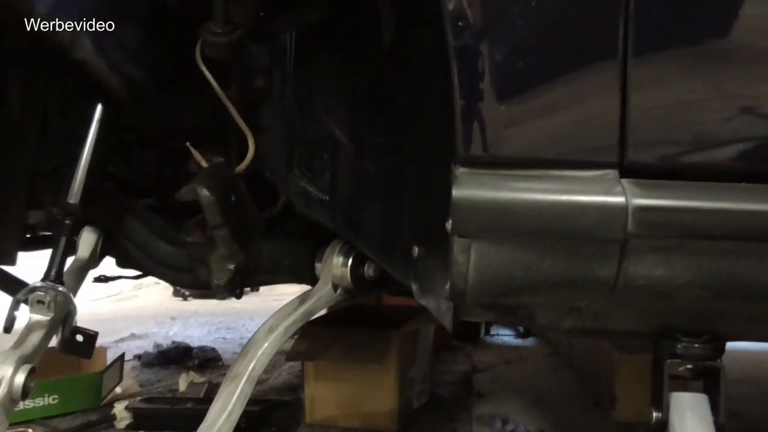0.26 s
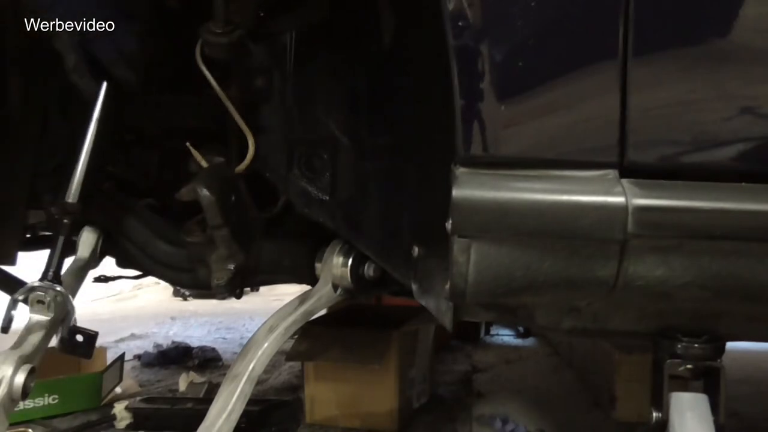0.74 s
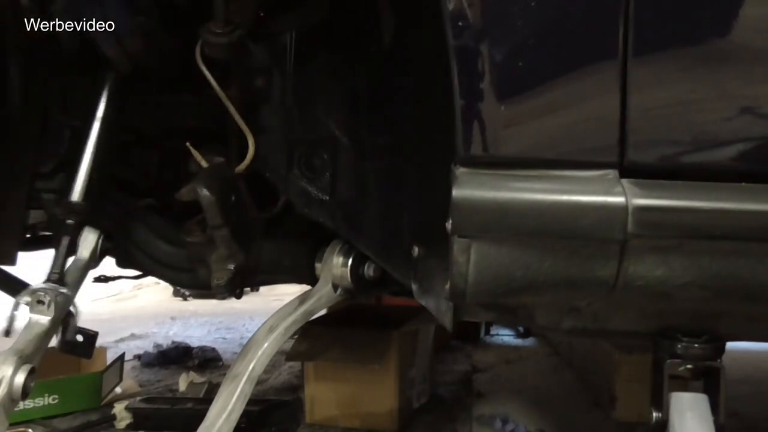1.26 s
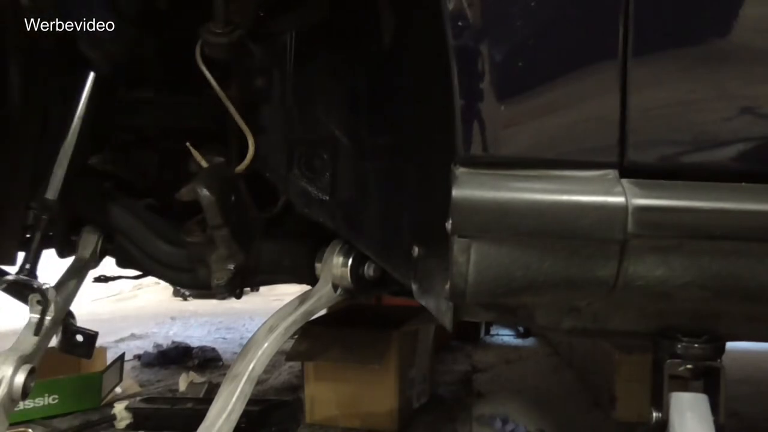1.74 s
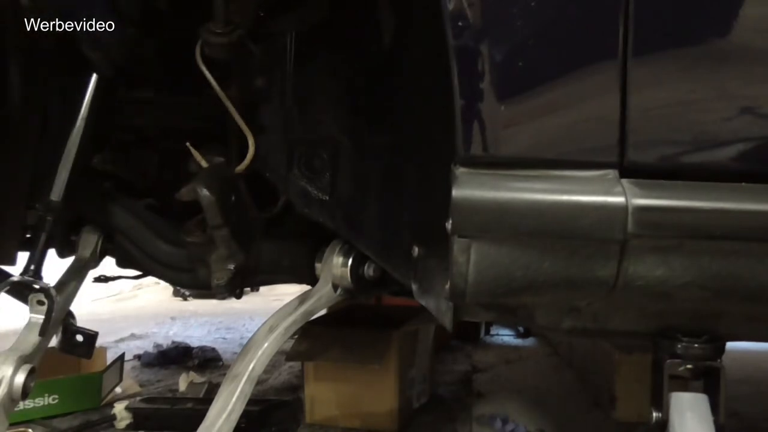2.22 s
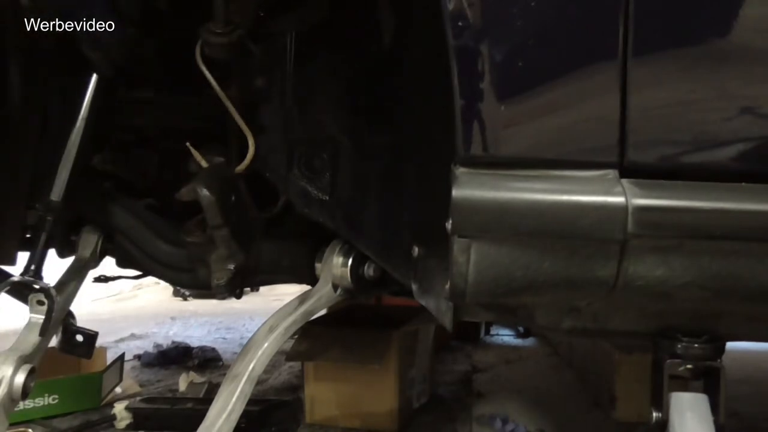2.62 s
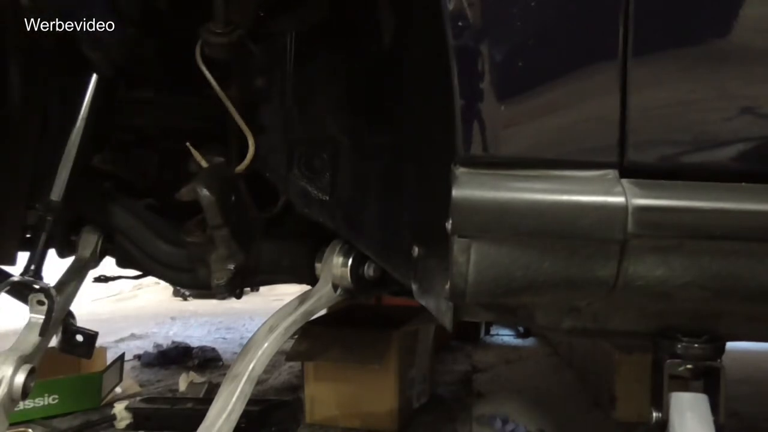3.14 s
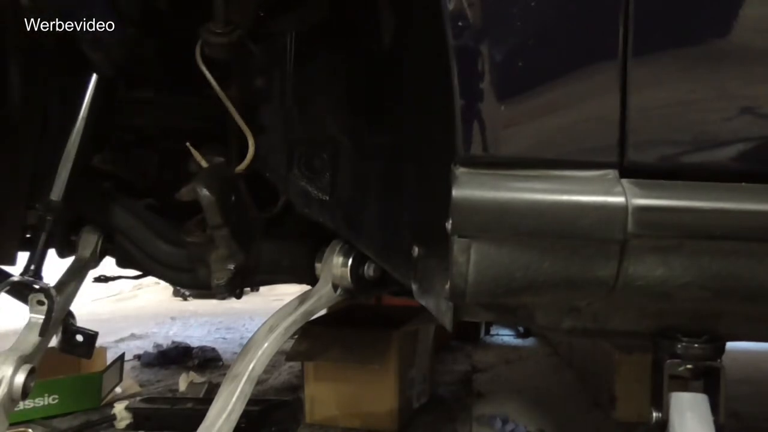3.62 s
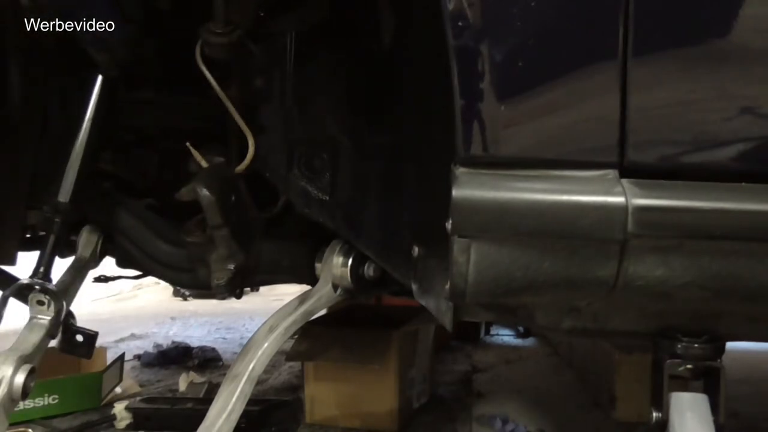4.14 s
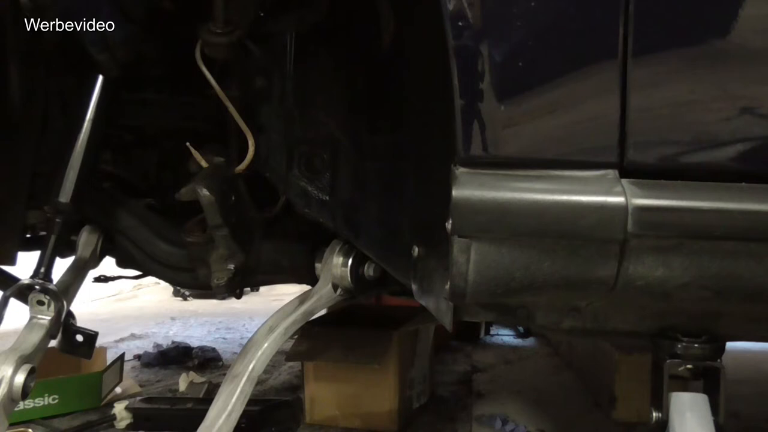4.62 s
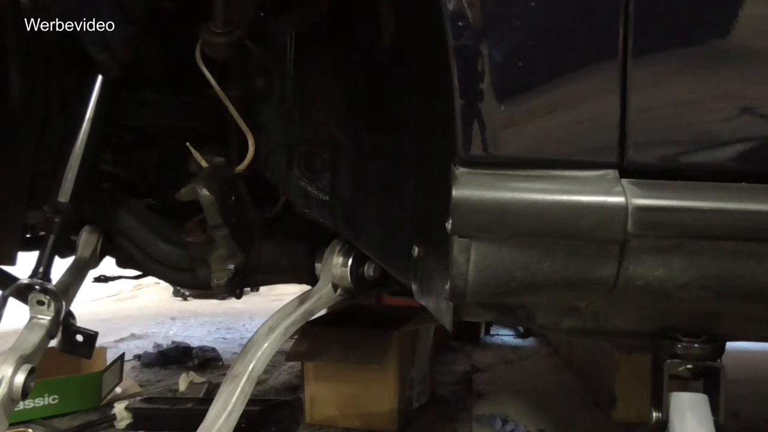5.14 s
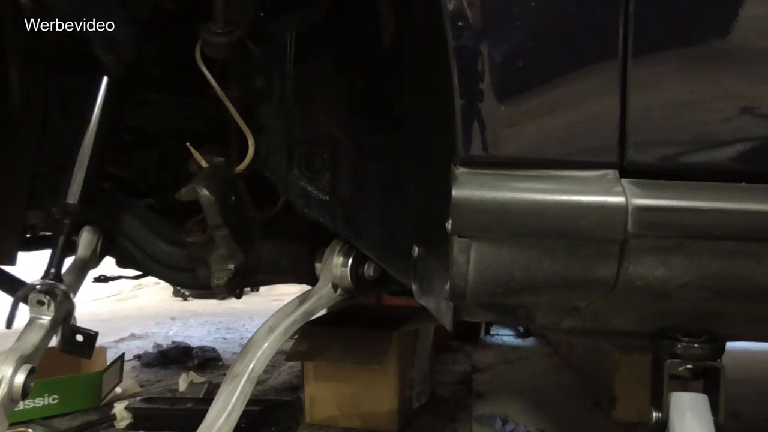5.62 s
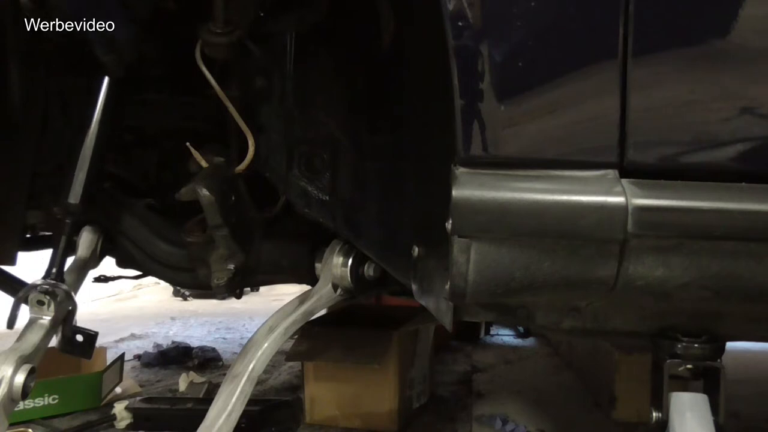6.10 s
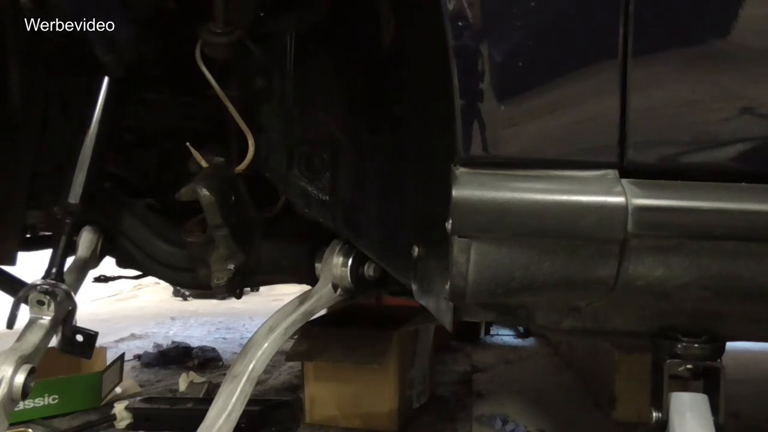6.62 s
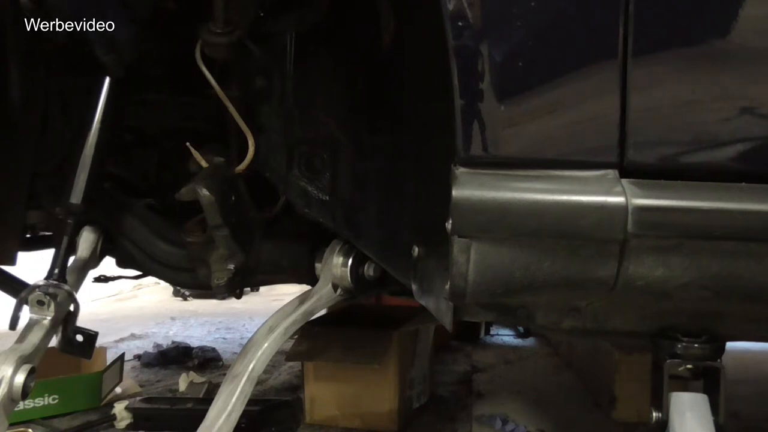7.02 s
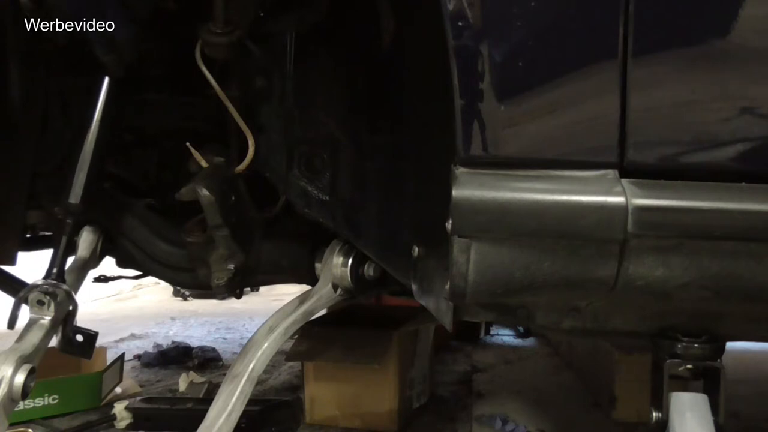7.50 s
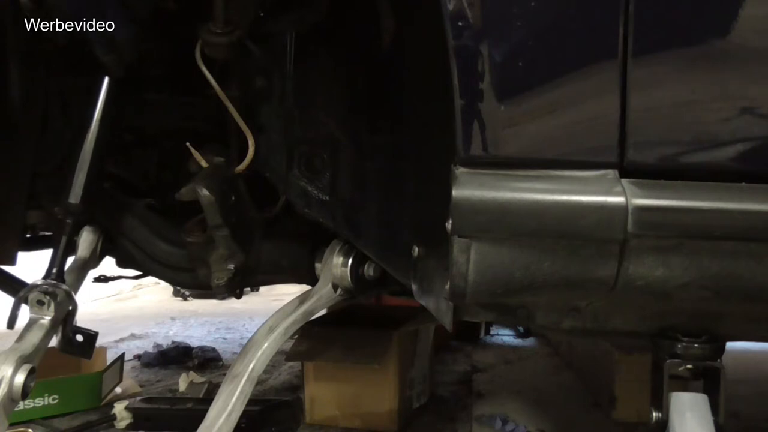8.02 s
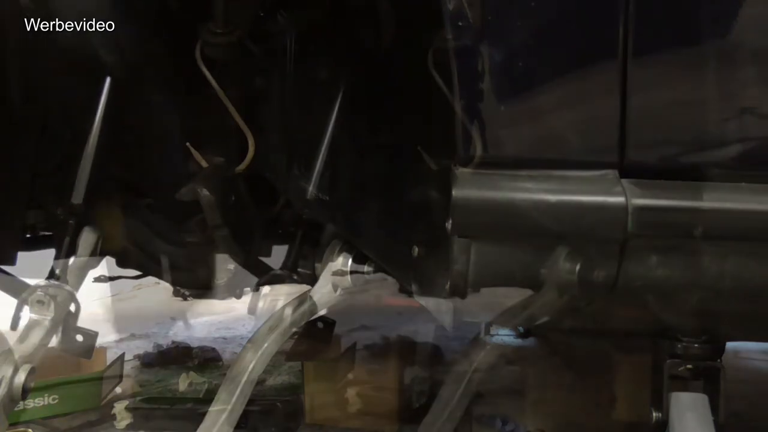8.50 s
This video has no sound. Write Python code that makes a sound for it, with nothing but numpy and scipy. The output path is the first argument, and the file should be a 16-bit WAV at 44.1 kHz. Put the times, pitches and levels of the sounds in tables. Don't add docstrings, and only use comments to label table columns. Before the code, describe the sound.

A close, thin-bass stereo microphone picks up hands working steel tools against an alloy suspension arm in a softly echoing garage with a faint steady hum. From 0 to 1 s sleeves rustle over muffled bumps and faint ticks. At 1.3-1.9 s heavy dull knocks boom through the chassis, strongest near 1.5, with gritty dragging. A soft low panel hum swells at 2.4. Two hard bright clanks strike at 2.7-2.8, then a lighter one at 3.2 and a quick ringing cluster at 3.4-3.5. From 3.7 to 5.4 come small taps, ticks and short scrapes. A clank and thud land at 5.5-5.6, sharper clanks at 6.0 and 6.4, smaller ones at 6.9-7.0. Light taps at 7.3 precede two panel hums at 7.6 and 7.8. A modest clank at 8.2 leads into rustling, scraping and soft knocks to the end.

```python
import sys
import numpy as np
from scipy import signal
from scipy.fft import rfft, irfft, next_fast_len
from scipy.io import wavfile

SR = 44100
rng = np.random.default_rng(int(sys.argv[2]) if len(sys.argv) > 2 else 0)


def master(y):
    cut = np.clip(np.atleast_2d(y).T, -1, 1)
    pcm = np.round(cut * 32767)
    wavfile.write(sys.argv[1], SR, pcm.astype(np.int16))


def amplitude_ratio(level_db):
    exponent = np.asarray(level_db, float) / 20
    return 10 ** exponent


N = 385875


def in_time(rows):
    s, *columns = np.transpose(rows)
    return [np.interp(np.arange(N) / SR, s, c) for c in columns]


def at_hz(points, hz, column=1):
    points = np.array(points)
    return np.interp(np.log(hz), np.log(points[:, 0]), points[:, column])


def rms_one(x):
    return x / np.sqrt(np.mean(x ** 2) + 1e-20)


def band(x, low_hz, high_hz):
    sos = signal.butter(2, [low_hz, min(high_hz, .45 * SR)], "band", fs=SR, output="sos")
    return signal.sosfilt(sos, x)


def drift(rate_hz):
    knots = rng.standard_normal(600)
    return np.interp(np.arange(N) / SR * rate_hz, np.arange(600), knots)


def ring(force, modes):
    out = 0
    for k, (hz, db, t60_s) in enumerate(modes):
        r, w = amplitude_ratio(-60 / (t60_s * SR)), 2 * np.pi * hz / SR
        mode = signal.lfilter([0, np.sin(w)], [1, -2 * r * np.cos(w), r * r], force + 1e-18)
        out = out + (-1) ** k * amplitude_ratio(db) * mode
    return out


def colour(force, peaks):
    out = 0
    for k, (hz, width_hz, db) in enumerate(peaks):
        r, w = np.exp(-np.pi * width_hz / SR), 2 * np.pi * hz / SR
        feed = (1 - r * r) / 2 * np.array([1, 0, -1])
        peak = signal.lfilter(feed, [1, -2 * r * np.cos(w), r * r], force + 1e-18)
        out = out + (-1) ** k * amplitude_ratio(db) * peak
    return out


def blows(start_s, level_db, contact_ms, first=5.7):
    force, age_ms = np.zeros(N + 2048), np.arange(2048) / SR * 1000
    decay = np.exp(-age_ms / np.clip(contact_ms, .3, 12)[:, None])
    shape = decay * (1 - np.exp(-age_ms / .5))
    impact = first * (np.arange(2048) == 20)
    spectrum = rfft(rng.standard_normal((len(start_s), 2048)) * shape + impact)
    evened = irfft(spectrum / np.sqrt(np.abs(spectrum)))
    chatter = evened * np.sqrt(np.sqrt(shape))
    for s, db, one in zip(start_s, level_db, chatter):
        force[round(s * SR):][:2048] += amplitude_ratio(db) * one / np.sqrt(np.sum(one ** 2))
    return force[:N]


def grit(per_s, spread_db):
    sizes = amplitude_ratio(spread_db * np.minimum(rng.exponential(1, N), 4)) * rng.standard_normal(N)
    return rms_one(sizes * (rng.random(N) < per_s / SR))


EDGES_HZ = 28 * 2 ** np.arange(0, 9.6, .5)


def stereo_bands(white, gain_at, likeness_at, edges_hz=EDGES_HZ):
    out = 0
    for k, (low, high) in enumerate(zip(edges_hz, edges_hz[1:])):
        mid, side = band(white[k % 2], low, high)
        hz = np.sqrt(low * high)
        alike = np.clip(likeness_at(hz), 0, 1)
        pair = np.sqrt(1 + alike) * mid + np.sqrt(1 - alike) * side * [[1], [-1]]
        out = out + gain_at(hz) * pair
    return out


# [pitch_hz, density_db_per_hz]
HUM = [(20, -33), (114, -2), (223, -0.5), (277, -3), (344, -1.5), (754, -16), (1160, -10), (1330, -18),
       (2840, -43), (4490, -26), (5880, -43), (10100, -20), (12900, -29.5), (16000, -52)]
# [pitch_hz, left_right_likeness (0-1)]
AIR_LIKENESS = [(60, 0.99), (500, 0.7), (2000, 0.52), (6000, 0.768), (12000, 0.096)]
HUM_DB = -50.5


def hum():
    air = stereo_bands(rng.standard_normal((2, 2, N)),
                       lambda hz: amplitude_ratio(at_hz(HUM, hz) + 2.0 * drift(2.7)),
                       lambda hz: at_hz(AIR_LIKENESS, hz))
    whine = rms_one(ring(rng.standard_normal(N), [(1165.0, 0, 0.2)]))
    return amplitude_ratio(HUM_DB - 5.5) * rms_one(air) + amplitude_ratio(-69.0) * whine


# [pitch_hz, t60_s, level_db, left_right_likeness (0-1)]
GARAGE = [(58.3, 0.89, 9.5, 1), (247, 0.43, 1, 0.86), (966, 0.47, -1, 0.53), (2280, 0.45, -6.5, 0.47),
          (3500, .48, -10, 0.7), (4820, 0.45, -13, 0.58), (7500, 0.45, -13, .3), (12100, 0.3, -15.5, 0.093)]


def garage(x):
    t = np.arange(SR) / SR
    build = np.clip((t - .006) / 0.0073, 0, 1)

    def dying(hz):
        shape = build * amplitude_ratio(-60 * t / at_hz(GARAGE, hz))
        return amplitude_ratio(at_hz(GARAGE, hz, column=2)) * shape / np.sqrt(2 * np.sum(shape ** 2))

    tail = stereo_bands(rng.standard_normal((2, 2, SR)), dying, lambda hz: at_hz(GARAGE, hz, column=3))
    return signal.fftconvolve(x[None], tail, axes=1)[:, :N]


# [time_s, level_db]
STEADY = [(2.7, -73.5), (3.61, -75), (3.81, -74.5), (4.78, -74.5), (4.95, -77.5), (5.41, -82.5),
          (5.7, -69.5), (6.49, -82), (7.38, -85)]
# [start_s, length_s, level_db]
MOVES = [(-.05, 0.21, -63), (0.179, 0.44, -60), (0.771, 0.14, -58), (0.91, 0.31, -70.5),
         (1.27, 0.47, -71.5), (1.424, 0.081, -56), (1.742, 0.42, -64), (2.183, 0.21, -69),
         (2.52, 0.021, -68), (7.488, 0.2, -64.5), (7.722, 0.27, -71), (8.166, 0.12, -53.5),
         (8.317, 0.19, -60.5), (8.472, 0.34, -58)]
MOVE_RISE_S, MOVE_FALL_S = 0.073, 0.24


def rustling():
    t = np.arange(0, N + 64, 64) / SR
    swells = 0
    for s, length, db in MOVES:
        rise, fall = (t - s) / MOVE_RISE_S + .5, (s + length - t) / MOVE_FALL_S + .5
        swells = swells + amplitude_ratio(db) * np.clip(np.minimum(rise, fall), 0, 1) ** 2
    return amplitude_ratio(in_time(STEADY)[0]) + np.interp(np.arange(N) / SR, t, swells)


# [pitch_hz, density_db_per_hz]
RUSTLE = [(880, -29), (1500, -5.5), (1670, -2.5), (2400, -10.5), (4500, -3), (5880, -9), (10100, -1.5),
          (16000, -9.5)]


def sleeves():
    white = np.array([[grit(per_s=12000, spread_db=-2.5) for side in "ms"] for draw in "ab"])
    fizz = stereo_bands(white,
                        lambda hz: amplitude_ratio(at_hz(RUSTLE, hz) + 1.0 * drift(54)),
                        lambda hz: at_hz(AIR_LIKENESS, hz), EDGES_HZ[11:])
    soft = signal.sosfilt(signal.butter(4, 12000, fs=SR, output="sos"), fizz)
    return amplitude_ratio(6.5) * rustling() * rms_one(soft)


PANEL_HZ = 222.2
# [time_s, level_db]
PANEL = [
    [(2.25, -67), (2.362, -48), (2.55, -74)],
    [(7.45, -77), (7.59, -46), (7.69, -73), (7.8, -52.5), (7.95, -65)],
]


def panel():
    t = np.arange(N) / SR
    swell = sum(amplitude_ratio(in_time(rows)[0]) * (t > rows[0][0]) * (t < rows[-1][0]) for rows in PANEL)
    return swell * rms_one(ring(rng.standard_normal(N), [(PANEL_HZ, 0, .5)]))


# [start_s, peak_db, upper_mode_hardness_db, contact_ms]
KNOCKS = [(0.245, -36, -15, 6), (0.312, -33, -1, 5.2), (0.38, -34.5, -3, 21), (0.408, -49, 5, 7.8),
          (0.482, -37, 10.5, 2.4), (0.474, -40, 0, 6.1), (0.398, -44, 9.5, 5), (1.366, -26.5, -1, 22),
          (0.521, -46.5, 9, 4.9), (0.792, -28.5, 0, 18), (0.829, -35, -33, 13), (1.07, -34, -31.5, 4.2),
          (1.287, -44, 13.5, 25), (1.375, -19, -7, 20), (1.398, -28, -17, 14), (1.495, -10, -3.5, 4.8),
          (1.517, -15, -13, 14), (1.57, -45, 19, 10), (1.603, -24, -5.5, 4.3), (1.696, -17.5, -11.5, 4.5),
          (1.75, -42, 3, 7), (1.788, -39, 5.5, 23), (1.859, -30.5, -6, 4.8), (4.188, -35, -13, 7.8),
          (2.281, -52.5, 6, 4), (5.602, -22, -1, 7), (5.649, -23, -30, 10), (5.712, -29, -26, 11.2),
          (6.066, -31, -1.5, 14), (7.357, -36.5, 2, 2.7), (8.259, -43, -23, 4.6), (8.685, -29.5, -2.5, 3.2),
          (8.72, -35.5, -3, 18)]
# [start_s, peak_db, hardness_db]
CARRIED = [(2.721, -54, 3), (3.398, -40, 1), (6.02, -30.5, -10), (6.403, -36.5, 7), (7.008, -31, -16),
           (8.191, -35.5, -7)]
CARRIED_MS = 10
# [pitch_hz, level_db, t60_s]
CHASSIS_LOW = [(125.6, -23.5, 1), (152, -12, 0.08), (221.8, -2, 0.12), (249.3, 0.5, 0.12),
               (347.6, 4.5, 0.051), (366.7, 3, 0.081)]
# [pitch_hz, level_db, t60_s]
CHASSIS_HIGH = [(416, -9, 0.13), (497, -3, 0.13), (548, -1.5, 0.053), (625, 1, 0.037), (720, -8, 0.077)]
# [pitch_hz, level_db, t60_s]
SWAY = [(54.3, -45.5, 0.5)]


def knocks(rumble_db):
    s, db, hard_db, ms = np.transpose(KNOCKS + [(*row, CARRIED_MS) for row in CARRIED])
    low = blows(s, db, ms, first=4.25)
    high = blows(s, db + hard_db, 0.93 * ms, first=8.3)
    boom = amplitude_ratio(-6.5) * ring(low, CHASSIS_LOW) + amplitude_ratio(-2) * ring(high, CHASSIS_HIGH)
    thump = amplitude_ratio(36.0) * band(low, 143.4, 440) + amplitude_ratio(31.0) * band(high, 480, 990)
    shove = rms_one(ring(rng.standard_normal(N), CHASSIS_LOW + CHASSIS_HIGH))
    body = band(boom + thump + amplitude_ratio(rumble_db - 9.5) * shove, 110, 916)
    return body + ring(band(low, 45, 64), SWAY)


BUSH_HZ, BRACKET_HZ, MOUNT_HZ, LINK_HZ, EYE_HZ = 309, 327, 384, 421, 2060
ARM_HZ, SHANK_HZ, BOLT_HZ, COLLAR_HZ, TIP_HZ, SOCKET_HZ = 900, 4500, 3830, 8230, 9900, 12915
SHAFT_HZ, NUT_HZ, RIM_HZ, PIN_HZ = 4660, 5280, 13060, 3420
# [start_s, pitch_hz, level_db]
PINGS = [(1.507, BRACKET_HZ, -14.5), (2.722, ARM_HZ, -21.5), (2.722, SHANK_HZ, -26), (3.256, NUT_HZ, -41),
         (3.383, NUT_HZ, -21.5), (3.398, SOCKET_HZ, -47), (3.422, SOCKET_HZ, -42), (3.876, NUT_HZ, -32),
         (4.166, SHANK_HZ, -47), (7.046, PIN_HZ, -48), (3.453, RIM_HZ, -35), (6.025, BOLT_HZ, -29),
         (6.374, SOCKET_HZ, -50), (6.404, SHAFT_HZ, -27.5), (3.256, SOCKET_HZ, -50), (3.257, TIP_HZ, -32.5),
         (3.384, SOCKET_HZ, -48), (3.386, TIP_HZ, -21), (3.399, SHAFT_HZ, -15.5), (3.423, TIP_HZ, -16.5),
         (3.421, SHANK_HZ, -18), (3.453, SOCKET_HZ, -30), (6.876, SHANK_HZ, -46), (6.876, PIN_HZ, -34),
         (4.252, ARM_HZ, -32), (6.023, EYE_HZ, -23), (4.605, BOLT_HZ, -34), (4.891, SOCKET_HZ, -57),
         (5.533, BOLT_HZ, -22), (5.532, TIP_HZ, -43), (5.607, LINK_HZ, -28), (5.605, BUSH_HZ, -26.5),
         (6.022, COLLAR_HZ, -29.5), (6.017, TIP_HZ, -28), (6.024, TIP_HZ, -23), (6.022, MOUNT_HZ, -28)]
SONG_S = {ARM_HZ: 0.0302, SHANK_HZ: 0.036, BOLT_HZ: 0.036, COLLAR_HZ: 0.25, TIP_HZ: 0.022, SOCKET_HZ: 0.24,
          SHAFT_HZ: 0.024, NUT_HZ: 0.025, RIM_HZ: .12, PIN_HZ: 0.033, BUSH_HZ: 0.13, BRACKET_HZ: 0.11,
          MOUNT_HZ: 0.11, LINK_HZ: 0.27, EYE_HZ: 0.024}
HELD_SPREAD = 3


def pings():
    out, age = np.zeros(N + SR), np.arange(SR // 2) / SR
    detune, share = np.array([[0], [.0028], [-.0065]]), np.array([[1], [.55], [.35]])
    for (s, hz, db), turns in zip(PINGS, rng.random((len(PINGS), 3, 1))):
        spread = HELD_SPREAD if SONG_S[hz] < .07 else 1
        waves = np.sin(2 * np.pi * (hz * (1 + spread * detune) * age + turns))
        cluster = np.sum(share ** (1 / spread) * waves, axis=0)
        decay = amplitude_ratio(db - 60 * age / SONG_S[hz])
        out[round(s * SR):][:SR // 2] += decay * np.minimum(age / 0.00054, 1) * cluster
    return out[:N]


# [start_s, length_s, steel_db, alloy_db]
STROKES = [(1.353, 0.058, -58.5, -42), (1.43, 0.021, -59, -59), (2.201, .15, -80, -60.5),
           (2.745, .055, -72, -39), (2.814, .065, -72, -42), (3.463, .12, -51, -52), (6.9, .05, -70, -50),
           (7.031, 0.068, -70, -50), (4.009, 0.038, -60, -68), (6.845, 0.022, -65, -46),
           (3.075, 0.036, -74, -44.5), (3.787, 0.026, -52, -41), (4.106, 0.12, -49.5, -50.5),
           (4.153, 0.04, -56, -71), (.37, .06, -57, -66), (5.988, 0.036, -49.5, -58),
           (4.25, 0.04, -74, -45.5), (4.313, 0.037, -50.5, -44), (4.51, 0.084, -56, -45),
           (4.585, 0.1, -53, -44), (4.775, 0.057, -58, -52), (4.889, 0.046, -54.5, -45),
           (5.255, 0.043, -59, -48.5), (5.42, 0.055, -57.5, -57), (5.833, 0.038, -56.5, -46),
           (6.003, 0.026, -46, -40), (6.818, 0.027, -79, -47), (7.312, 0.097, -81, -52.5),
           (8.108, 0.067, -61.5, -55.5), (8.184, 0.036, -66, -52), (8.301, 0.11, -66.5, -57.5),
           (8.457, 0.11, -53.5, -60)]
# [pitch_hz, width_hz, level_db]
SCRAPED = [(2600, 200, -8.5), (4500, 280, 0.5), (5470, 310, -7), (12915, 330, -12)]


def scrapes(drag_db):
    t, steel_gain, alloy_gain = np.arange(N) / SR, np.zeros(N), amplitude_ratio(drag_db - 7.0)
    for s, length, steel_db, alloy_db in STROKES:
        span = slice(round(s * SR), round((s + length) * SR))
        press = np.clip(np.minimum(t[span] - s, .5 * (s + length - t[span])) / .012, 0, 1)
        steel_gain[span] += amplitude_ratio(steel_db) * press
        alloy_gain[span] += amplitude_ratio(alloy_db) * press
    uneven = amplitude_ratio(3.2 * np.minimum(drift(60), 1))
    whistle = rms_one(colour(grit(per_s=3000, spread_db=2.5), SCRAPED))
    hiss = rms_one(band(colour(grit(per_s=12000, spread_db=3.0), TIP), 5500, 11000))
    steel = whistle + .6 * hiss
    alloy = rms_one(band(colour(grit(per_s=1500, spread_db=1.8), ARM), 250, 1900))
    return uneven * (steel_gain * steel + alloy_gain * alloy)


# [start_s, pitch_hz, level_db, contact_ms]
GLANCES = [(.198, 1150, -12, 4), (0.311, 936, 4.5, 2.4), (0.475, 3900, -13, 8), (0.475, 1300, -2.5, 8.2),
           (1.385, 4500, -22, 5.1), (1.497, 3820, -3, 10), (1.505, 1920, -5, 8), (1.639, 6000, -24, 4),
           (2.7228, 12900, -10, .8), (2.725, 2600, 8.5, 5), (2.797, 13000, -11, 1), (2.798, 6200, 5, 2),
           (2.799, 2770, 5, 7.1), (3.172, 2480, 1.5, 8.2), (3.188, 10000, -20, 10), (3.398, 13200, -5, 1.5),
           (3.398, 5940, 8, 4.5), (3.422, 6200, 1, 4), (3.456, 8930, -13, 1.8), (3.804, 5000, -22, 4),
           (4.122, 800, 0, 3), (4.261, 840, 3, 3.2), (4.271, 900, -6, 2.4), (4.322, 860, 6.5, 3.9),
           (4.543, 4000, -17, 3), (4.555, 3780, -13, 3), (4.574, 900, -8, 3.9), (4.636, 1210, -8, 2.9),
           (4.662, 4600, -18, 4), (4.807, 4500, -19, 5), (4.84, 800, 2, 4), (4.919, 8070, -26, 3),
           (5.512, 2000, -13, 3.8), (5.686, 5000, -24, 2), (5.74, 9000, -26, 5), (5.8619, 640, 11, .4),
           (5.884, 3840, -13, 5.7), (6.022, 2300, 6.5, 3.2), (6.822, 1460, -10, 2), (6.865, 890, 8, 1.8),
           (6.876, 2120, -6, 4), (6.878, 10000, -19, 6), (7.016, 9430, -20, 3), (7.023, 9000, -13, 7),
           (7.085, 800, -5, 4), (8.283, 7500, -19, 2), (8.575, 1300, -10, 12), (8.412, 10100, -14, 1),
           (7.359, 3250, -16, 5), (8.64, 2200, -12, 11),
           (1.4955, 680, 28, 0.7), (1.602, 663, 15, 5.4), (1.6965, 600, 15, 0.54), (3.679, 896, 2.5, 3.4),
         (3.797, 820, 7.5, 4.5), (4.249, 830, 4, 2.1), (5.602, 340, 20, 2.3), (6.012, 4330, -2, 10),
         (6.0235, 480, 14, 1.8), (6.404, 1480, 6.5, 8.7), (7.008, 1060, 2.5, 3.4), (7.016, 880, 3, 1.8),
         (7.334, 4430, -14.5, 3)]
GLANCE_WIDTH = 0.31


def glances():
    s, hz, db, ms = np.transpose(GLANCES)
    slots_s = np.arange(len(s)) * 4096 / SR
    forces = blows(slots_s, db, ms, first=4.0)[:len(s) * 4096].reshape(-1, 4096)
    out = np.zeros(N + 4096)
    for start, pitch, force in zip(s, hz, forces):
        peak = [(pitch, GLANCE_WIDTH * pitch, 0)]
        out[round(start * SR):][:4096] += colour(colour(force, peak), peak)
    return out[:N]


# [start_s, shank_peak_db, arm_re_shank_db, tip_re_shank_db, socket_re_shank_db]
CLANKS = [(1.434, -37, 3.5, -9.5, -25), (1.443, -38, -3, -7, -25), (1.4964, -32, 8, -9.5, -29),
          (1.631, -43.5, -4, 2, -7), (2.7229, -14, -6, -20.5, -40), (2.7974, -12.5, -6.5, -23, -36),
          (3.1708, -25, 4.5, -38, -52), (3.2556, -33.5, 8.5, -7.5, -33), (3.3834, -24.5, 2, -5.5, -32.5),
          (3.3975, -15.5, -11.5, -11, -32), (3.4124, -48, 22, 15, -19), (3.4211, -47.5, 30.5, 24.5, -9.5),
          (3.4528, -16, -5, -12, -22), (3.8742, -27.5, -1.5, -14.5, -45), (4.5923, -31, 0.5, -37, -37),
          (4.6057, -29.5, 1.5, -10.5, -42), (5.533, -21, -2.5, -8, -36.5), (5.8614, -32.5, 4, -18, -22),
          (6.0126, -23, 0.5, -10, -31), (6.0225, -22, 5, -6, -40), (6.3723, -52.5, 24, 8.5, 2),
          (6.4033, -24.5, 4.5, -1.5, 2), (6.8752, -32, 7.5, -18, -45), (7.006, -34, 11.5, -12.5, -31),
          (8.1937, -31.5, 2, -11.5, -35)]
# [start_s, shank_peak_db, arm_re_shank_db, tip_re_shank_db]
TAPS = [(1.2706, -55.5, 18, -1), (1.3673, -46, 15.5, -18), (1.8607, -45.5, 10, -6), (2.7189, -41, 22, -19),
        (3.0754, -49.5, 10, -23), (3.521, -47.5, 23.5, -15), (3.6741, -54.5, 10, -10),
        (3.7144, -54.5, 13.5, -9), (3.7868, -50, 12, 0), (4.0432, -54, 14, 2.5), (4.1126, -58, 16, -11.5),
        (7.378, -52, 15, -30), (6.936, -61, 23.5, -20), (4.3176, -45, -4, -29), (4.3834, -52, 5, -12),
        (4.5165, -38, 5, -17), (4.7857, -55, 3, -18), (4.8456, -60, 20, -11), (4.8904, -54, 11.5, -1),
        (5.1599, -57.5, 17, -16.5), (5.3468, -56, 15, -20), (5.5109, -51.5, 15.5, -9),
        (5.8347, -43, 8.5, -12), (5.8556, -45, 16, 1.5), (6.8644, -42, 16, -8), (7.3179, -49, 14, -28),
        (7.3336, -44, 7, -31), (7.3567, -45.5, 9.5, -37.5)]
# [start_s, shank_peak_db, tip_re_shank_db]
TICKS = [(0.919, -55, 8.5), (1.698, -40.5, -14), (2.392, -70, 13), (4.1679, -41, -15), (5.2406, -48, -8.5),
         (5.268, -61, 6), (5.4436, -51, -15), (5.8886, -53, -4), (5.9983, -57, -7), (7.0447, -43, -8),
         (7.077, -45, -9), (7.9149, -46, -27), (8.321, -55.5, 5.5), (8.339, -66, 1), (8.744, -56, 8)]
# [pitch_hz, width_hz, level_db]
ARM = [(507, 380, -0.5), (725, 174, 2.5), (906, 145, 0.5), (1480, 187, -5), (2040, 340, -9.5)]
# [pitch_hz, width_hz, level_db]
SHANK = [(2260, 710, -14.5), (3340, 330, -2.5), (4280, 360, 1), (5320, 1130, -9.5)]
# [pitch_hz, width_hz, level_db]
TIP = [(6550, 6800, -2.5), (8530, 1800, 2), (10000, 640, -1.9)]
# [pitch_hz, width_hz, level_db]
SOCKET = [(11900, 900, -9), (13050, 1000, 0), (14200, 900, -19)]
# [pitch_hz, level_db, t60_s]
STEEL = [(1480, -3.5, 0.044), (2100, -4.5, 0.059), (2630, -7.5, 0.054), (3070, -3, 0.067), (3410, -3, .06),
         (4360, -3.5, .04), (4620, -5.5, .05), (5240, -6, .05), (6200, -6, .04), (7740, -9.5, .04)]
STEEL_DB = -44
CLANK_MS, TAP_MS, TICK_MS = 7.2, 7.0, 7.0
SHANK_SHARE, TIP_SHARE = 0.88, 0.94
SHORTER_DB_PER_DB = 0.26
TICK_ARM_DB, SOCKET_RE_TIP_DB = -31.5, -17.5


def clinks():
    rows = [(*row, CLANK_MS * amplitude_ratio(-SHORTER_DB_PER_DB * (row[1] + 23))) for row in CLANKS]
    rows += [(s, db, arm, tip, tip + SOCKET_RE_TIP_DB, TAP_MS) for s, db, arm, tip in TAPS]
    rows += [(s, db, TICK_ARM_DB, tip, tip + SOCKET_RE_TIP_DB, TICK_MS) for s, db, tip in TICKS]
    s, shank_db, arm_db, tip_db, socket_db, ms = np.transpose(rows)
    arm = blows(s, shank_db + arm_db + 31, ms)
    shank = blows(s, shank_db + 28.5, SHANK_SHARE * ms)
    tip = blows(s, shank_db + tip_db + 33.0, TIP_SHARE * ms)
    socket = blows(s, shank_db + socket_db + 40.5, TIP_SHARE * ms)
    low = band(colour(arm, ARM), 230, 3200) + band(colour(shank, SHANK), 1700, 6800)
    high = band(colour(tip, TIP), 4000, 13000) + band(colour(socket, SOCKET), 9500, 14800)
    return low + high + amplitude_ratio(STEEL_DB) * ring(shank, STEEL)


# [pitch_hz, left_lead_rad, left_re_right_db, scatter_rad]
PORTS = [(195.5, 0.25, 0.5, 0), (2000, .25, 1.5, .3), (5000, 0.3, 0, .25), (6300, .5, -1, .6),
         (8500, 1.2, -.5, 1.6), (11000, 0.8, -1, .9), (13000, .8, -2, .6), (16000, 1, -1.5, 1.2)]


def two_ports(x):
    size = next_fast_len(N)
    hz = np.fft.rfftfreq(size, 1 / SR) + 1
    scatter = np.interp(hz / 300, np.arange(80), rng.standard_normal(80))
    phase_rad = at_hz(PORTS, hz) + scatter * at_hz(PORTS, hz, column=3)
    half = np.exp(.5j * phase_rad) * amplitude_ratio(at_hz(PORTS, hz, column=2) / 2)
    return irfft(rfft(x, size) * np.array([half, 1 / half]), size)[:, :N]


# [start_s, length_s, cut_hz]
TOP_DIPS = [(3.262, .022, 13600), (3.465, .13, 14300), (6.04, .07, 14600), (6.381, .014, 13900),
            (6.408, .09, 14500)]


def dip_top(x):
    out = x.copy()
    for s, length, cut_hz in TOP_DIPS:
        span = slice(round((s - .01) * SR), round((s + length + .01) * SR))
        sos = signal.cheby1(8, .05, cut_hz, "high", fs=SR, output="sos")
        top = signal.sosfiltfilt(sos, x[:, span])
        out[:, span] -= top * signal.windows.tukey(top.shape[1], .02 / (length + .02))
    return out


# [time_s, arm_drag_db, chassis_rumble_db]
HANDLING = [(0.0, -57, -65), (0.24, -53, -43.5), (0.41, -47.5, -49.5), (1.32, -76, -54.5), (1.41, -50, -29),
            (1.56, -39, -50), (1.63, -54, -61), (2.07, -54.5, -62), (2.75, -63.5, -98), (3.75, -47, -47),
            (4.0, -55.5, -51.5), (4.77, -65, -44), (5.19, -63.5, -58), (5.73, -55.5, -41.5),
            (6.8, -90, -65), (7.82, -54, -61.5), (8.14, -67, -66), (8.75, -37, -51)]
SONG_ECHO = 0.36


def scene():
    drag_db, rumble_db = in_time(HANDLING)
    struck, song = clinks(), pings()
    rubbed = glances() + scrapes(drag_db)
    booms = knocks(rumble_db) + panel()
    echo = garage(struck + rubbed + SONG_ECHO * song + 0.61 * booms)
    near = two_ports(struck + booms) + two_ports(rubbed + song)
    return near + echo + sleeves() + hum()


def roll_off(x):
    return signal.sosfilt(signal.butter(12, 16670, fs=SR, output="sos"), x)


def record(dry):
    thin = signal.sosfilt(signal.butter(2, 45, "high", fs=SR, output="sos"), dry)
    thin = signal.sosfilt(signal.cheby2(10, 45, 16500, fs=SR, output="sos"), thin)
    mix = dip_top(thin)
    return roll_off(mix)


dry = scene()
out = record(dry)
master(out)
```